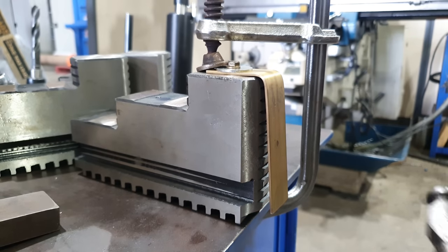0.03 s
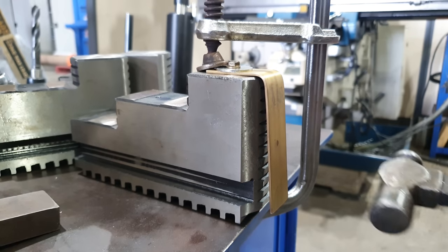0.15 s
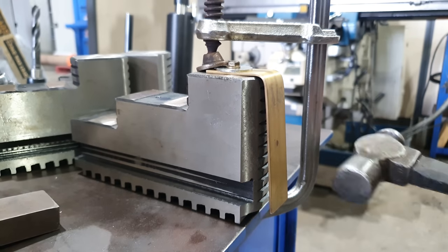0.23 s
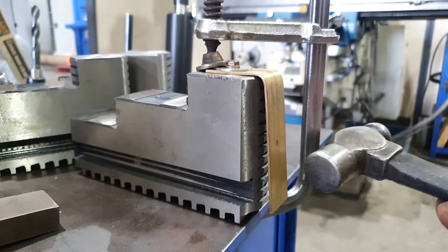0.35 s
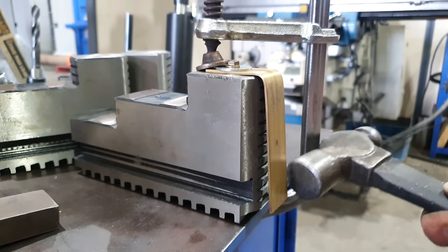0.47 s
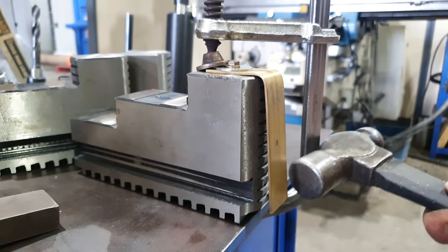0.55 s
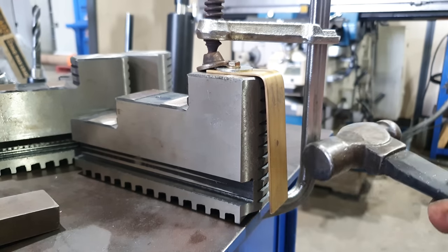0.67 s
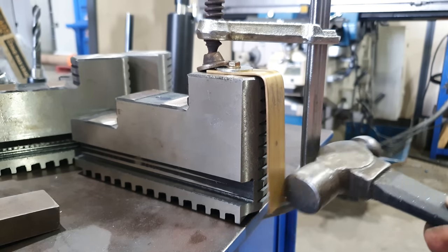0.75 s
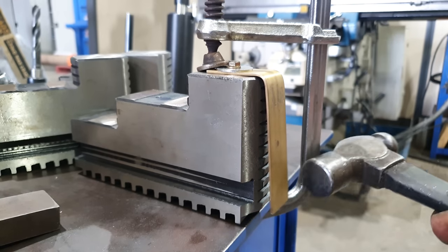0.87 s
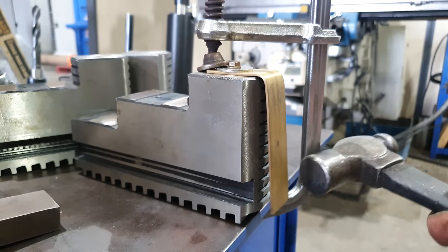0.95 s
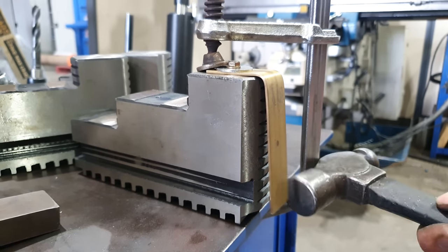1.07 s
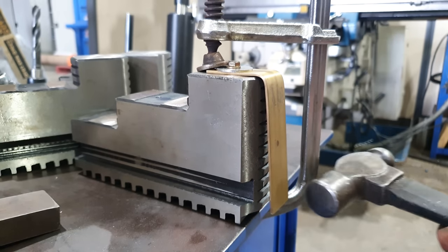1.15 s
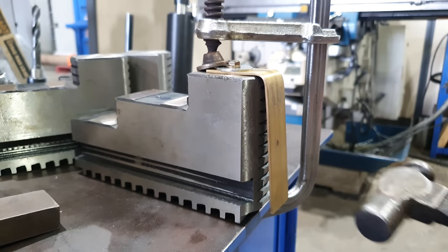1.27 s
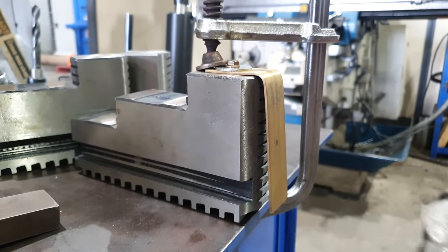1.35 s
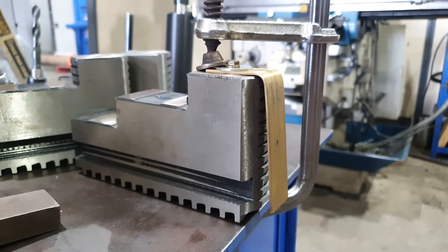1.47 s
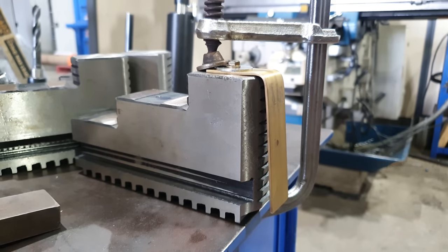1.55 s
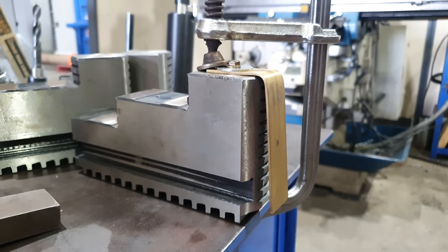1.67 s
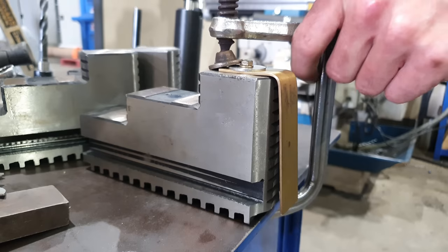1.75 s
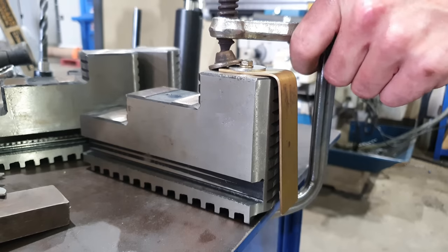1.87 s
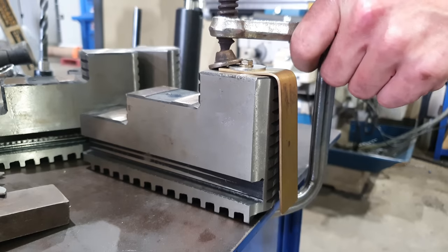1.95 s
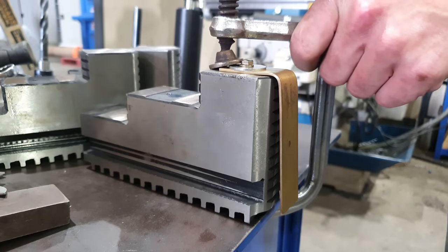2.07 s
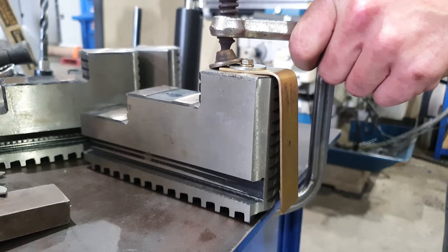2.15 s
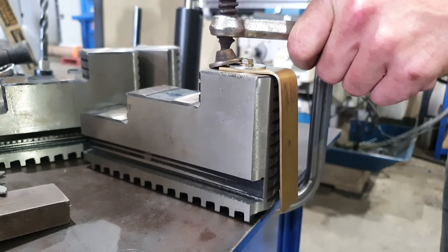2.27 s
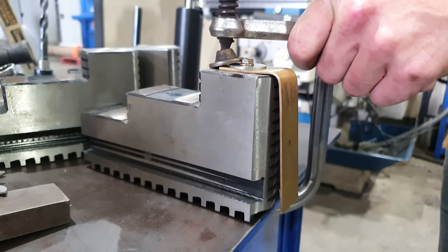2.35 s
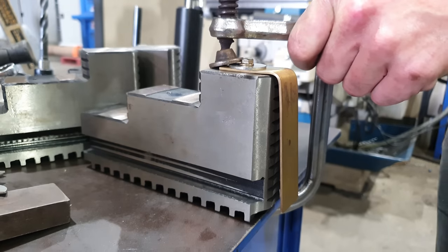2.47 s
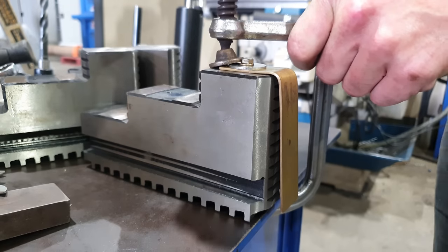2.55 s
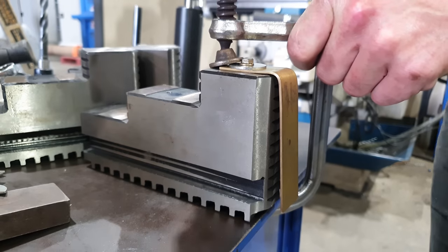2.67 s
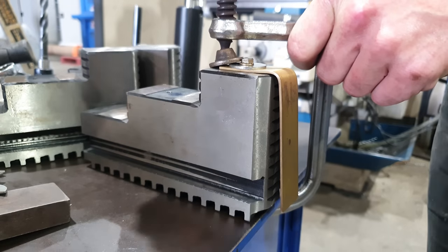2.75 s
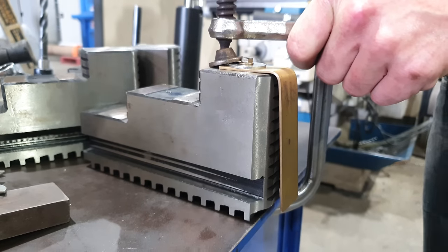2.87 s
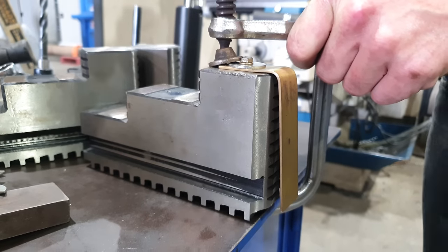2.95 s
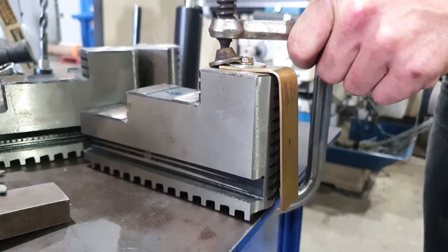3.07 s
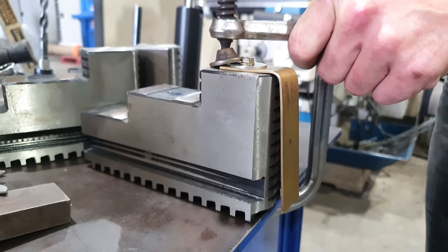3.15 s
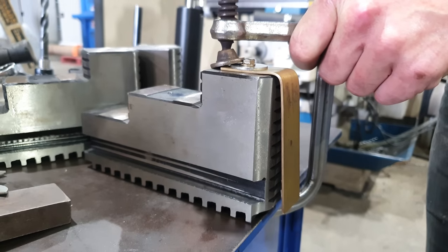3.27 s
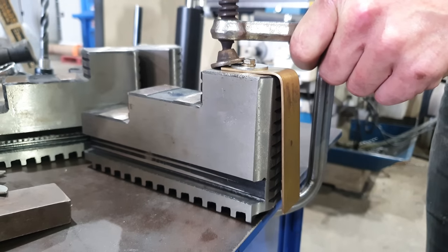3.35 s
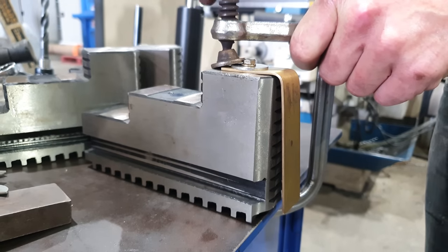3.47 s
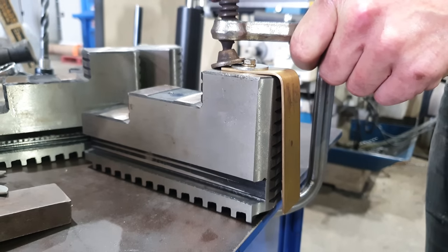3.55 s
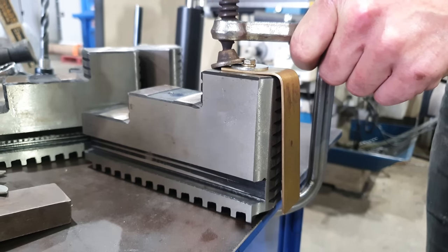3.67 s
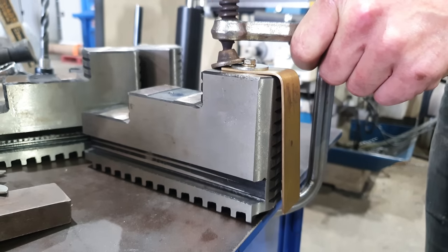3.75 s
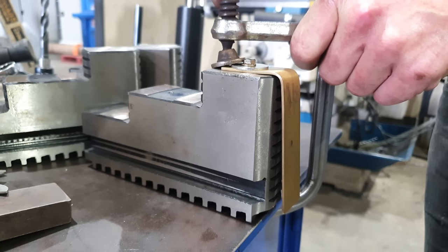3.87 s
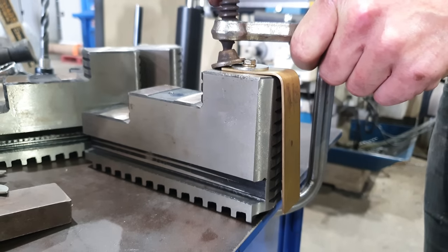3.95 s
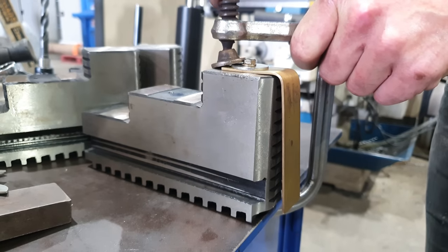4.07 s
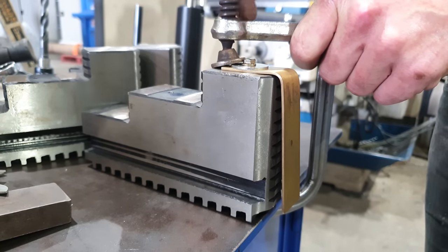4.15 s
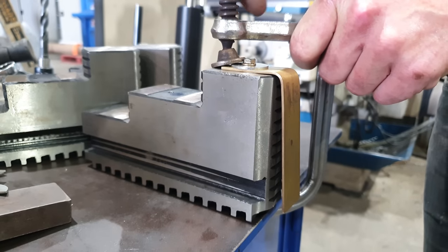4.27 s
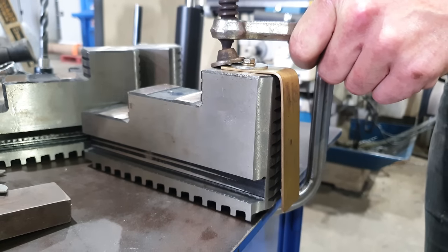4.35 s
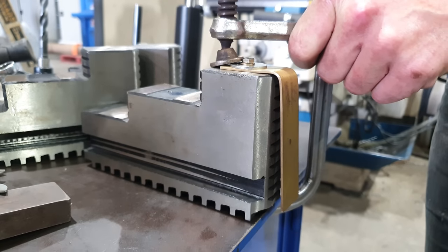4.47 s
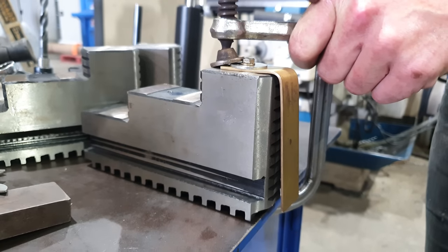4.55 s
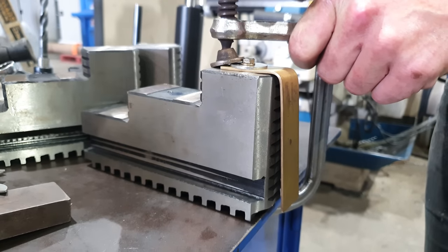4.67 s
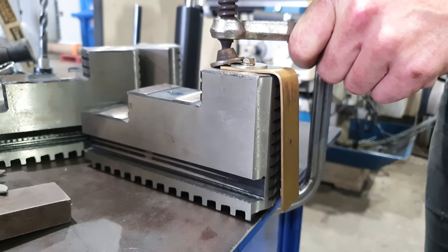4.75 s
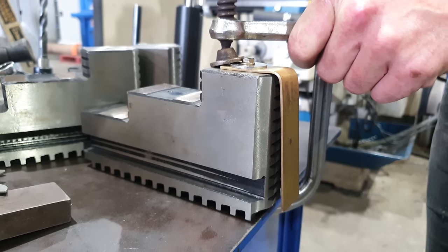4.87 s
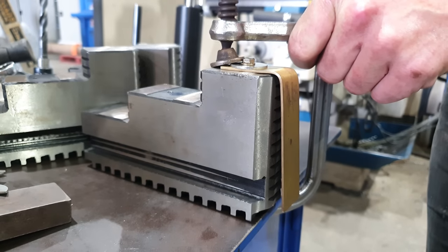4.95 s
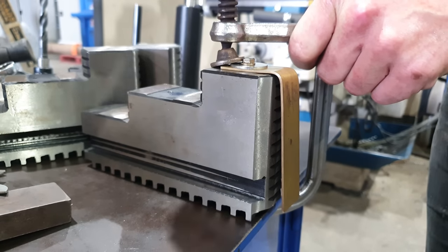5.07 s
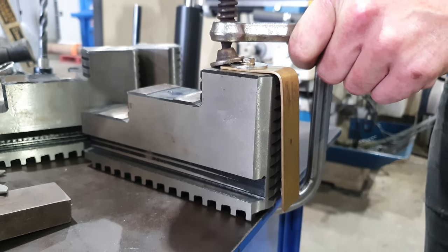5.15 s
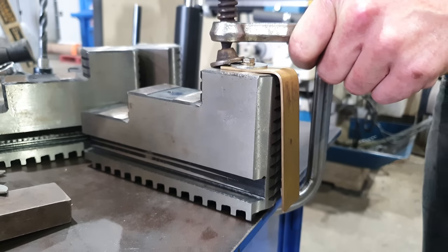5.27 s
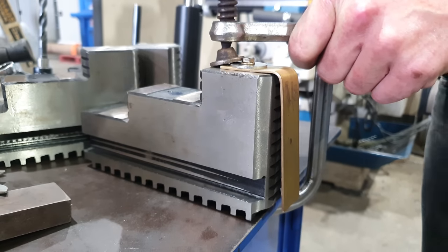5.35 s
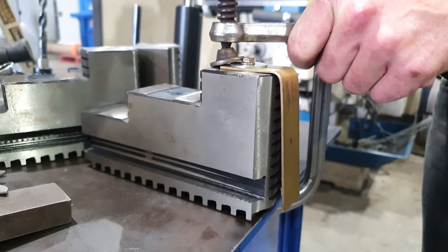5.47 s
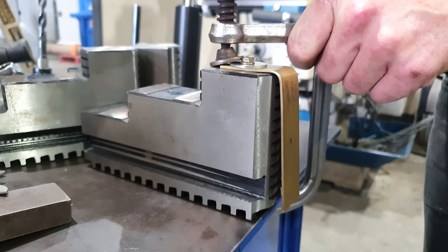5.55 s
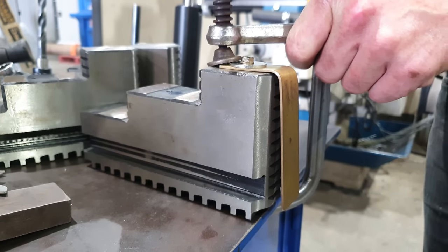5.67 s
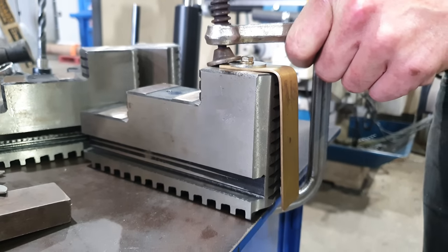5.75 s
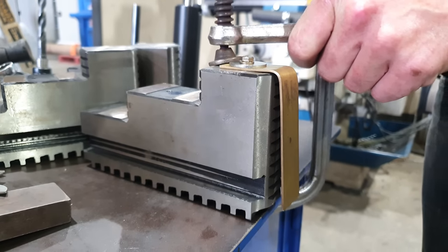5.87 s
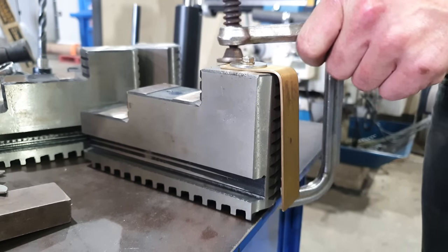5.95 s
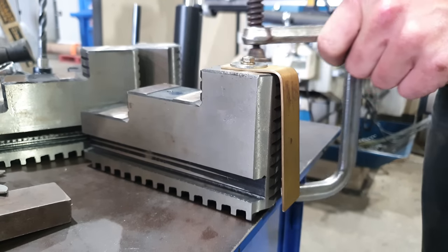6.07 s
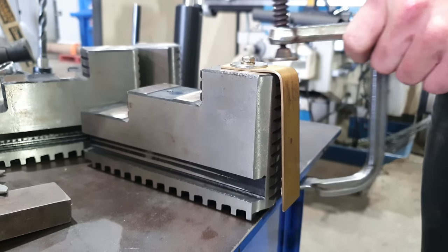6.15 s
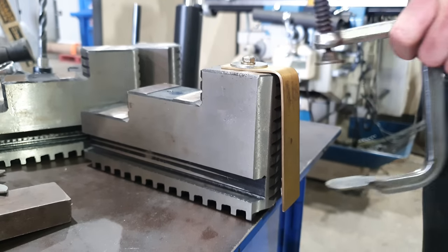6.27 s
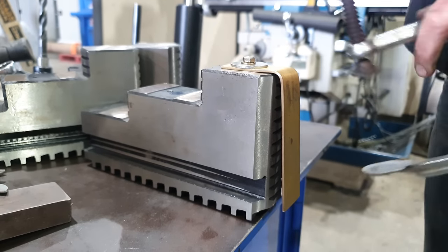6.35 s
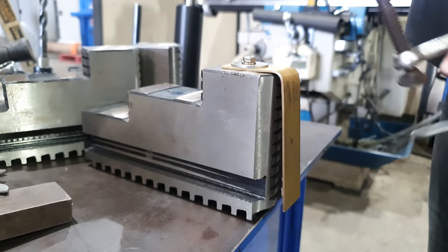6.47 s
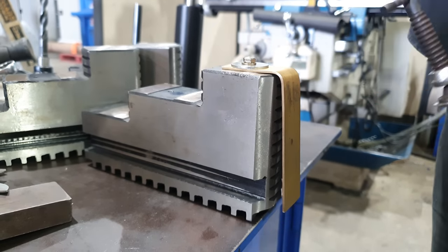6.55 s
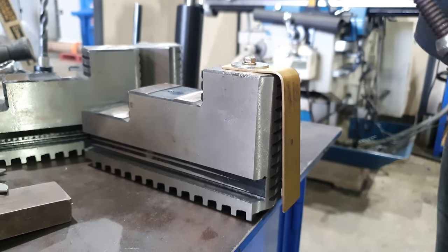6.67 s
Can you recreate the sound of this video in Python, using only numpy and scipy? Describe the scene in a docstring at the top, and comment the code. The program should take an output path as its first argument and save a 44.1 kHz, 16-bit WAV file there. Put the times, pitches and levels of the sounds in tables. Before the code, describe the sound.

In a workshop with a steady low rumble and faint machine hum, a short run of sharp, ringing hammer taps lands on metal close by. Softer, irregular knocks follow as a steel clamp is unscrewed, mixed with the quiet rub of a hand and a few slight thread squeaks. At the end the loose clamp clinks several times and rattles brightly as it is lifted off.

```python
"""In a workshop, a hammer taps a brass strip clamped on a steel jaw. A hand then works the clamp screw
loose with dull knocks, rubbing and faint squeaks; the clamp clinks, comes off and rattles away.
Each metal contact is a noisy crack plus ringing modes, echoing in the room; friction is swelling noise.
The workshop rumbles and hums behind."""
import sys
import numpy as np
from scipy import signal
from scipy.fft import rfft, irfft
from scipy.io import wavfile

SR = 44100
rng = np.random.default_rng(int(sys.argv[2]) if len(sys.argv) > 2 else 0)


def transcribe(signal):
    """Save signal, clipped to [-1, 1], as a 16-bit WAV file at the path in sys.argv[1]."""
    frames = np.atleast_2d(signal).T
    limited = np.clip(frames, -1, 1)
    pcm = np.round(limited * 32767).astype(np.int16)
    wavfile.write(sys.argv[1], SR, pcm)


N = 296352

# noise spectrum of the loose clamp: (frequency [Hz], relative density [dB])
CLAMP_SPECTRUM = [(88, -20), (150, -3), (378, -2.5), (830, -14), (2050, 6.5), (3230, -4.5), (5590, 4),
                  (9890, 0.5), (13000, 3.5), (15600, -8), (16500, -37)]


def hammer_blows():
    """Hammer, strip, jaw and clamp ring together; where a blow lands favours one pitch."""
    # (time [s], thud [dB], ring [dB], left-right [dB], favoured pitch [Hz], its lift [dB])
    blows = [(0.4793, -45, -21, -5.5, 2428, 23), (0.628, -39, -32.5, -1, 2020, 11.5),
             (0.7213, -45, -15, -1.5, 11980, 6.5), (0.9887, -49, -15.5, -0.5, 5890, 7)]
    # (frequency [Hz], relative level [dB], t60 [s])
    jaw_modes = [(329, -0.5, .15), (604, -5.5, .2), (1690, -4.5, 0.45), (2020, -3.5, .1), (2240, -8, 0.19),
                 (2387, -5.5, 0.1), (2420, -5, .1), (2479, -6.5, 0.16), (2900, -13, .1),
                 (3940, -2.5, 0.037), (4830, -10, 0.05), (5370, -7.5, .2), (5880, -16.5, 0.52),
                 (5900, -17, 0.52), (6800, 2.5, 0.11), (6470, 15, 0.039), (6600, -8, 0.25),
                 (6280, -11, 0.29), (8550, -14.5, 0.32), (8890, -4.5, 0.062), (9150, -13, 0.15),
                 (9540, -14, 0.1), (10780, -9, 0.16), (10750, -12, 0.51), (11980, 0.5, 0.13),
                 (13300, -18.5, .3), (13800, -6.5, .2), (15070, -15.5, 0.25), (15600, -11, .3)]
    # impact spectrum: (frequency [Hz], relative density [dB])
    crack = [(88, -77.5), (150, -45.5), (594, -12.5), (1140, -39), (2500, -14), (3350, -31.5), (3930, -16),
             (4870, -10.5), (6550, -1.5), (8290, -8.5), (10100, -17.5), (12300, -13), (13000, -21),
             (15600, -14), (16500, -36.5)]
    return contacts(blows, jaw_modes, crack, crack_t60_s=[0.049, 0.064, 0.022, 0.019],
                    body_db=6, body_share=0.25, sheen_db=-21.5, sheen_share=1.615, crack_db=7,
                    ring_db=-21, scatter_db=0.4, swell_rate=46, chatter_s=0.002, clean=1.0, rough=2.0)


def strip_ring():
    """A glancing blow leaves the strip's free end ringing until the next blow presses it down."""
    # free end: (frequency [Hz], level [dB], t60 [s])
    modes = [(1233, -45.5, 0.42), (3370, -46, 1)]
    start_s, stop_s = 0.64, 0.7213
    flick = np.zeros(N)
    flick[round(start_s * SR)] = 1
    out = sum(from_db(level_db) * ring(flick, hz, t60_s) for hz, level_db, t60_s in modes)
    out[round(stop_s * SR):] = 0
    return out * from_db([[-1.5], [1.5]])


def screw_knocks():
    """Screw and handle knock as the hand turns them, sounding the held clamp and the bench."""
    # (time [s], thud [dB], ring [dB], left-right [dB], favoured pitch [Hz], its lift [dB])
    knocks = [(2.2799, -30.5, -44.5, 4, 124, 19), (2.2944, -52, -81, -1, 250, 40),
              (3.01, -32.5, -39, 2, 2143, 13.5), (3.3774, -49, -49, 0, 6300, 5),
              (3.3993, -34.5, -44, 3.5, 250, 15), (3.8253, -39.5, -39, -0.5, 568, 19),
              (3.8444, -28.5, -62, 0, 327, 7.5), (4.0671, -43.5, -64, 5, 250, 8),
              (4.1222, -40.5, -75, 0, 568, 3), (4.3527, -41.5, -37.5, -2, 5170, 17),
              (4.3636, -37, -58, 6, 477, 20), (4.429, -44, -56, 0, 2143, 11),
              (4.4467, -32, -92, 3, 327, -7), (4.6738, -31, -43, 3, 568, 11), (4.812, -44, -51, 2, 2540, 8),
              (5.0412, -43, -65, 1.5, 250, 28), (5.3817, -32.5, -51.5, -1.5, 250, 19),
              (5.5493, -42, -73, -1, 124, 0)]
    # (frequency [Hz], relative level [dB], t60 [s])
    held_modes = [(124, -8.5, 0.3), (250, -9.5, 0.092), (327, 6.5, 0.066), (432, -13, .05),
                  (477, 2.5, 0.06), (568, 2, 0.092), (673, -5, .05), (937, 1, 0.04), (1289, 2, 0.21),
                  (1713, 0, 0.063), (2000, 6, 0.044), (2143, -3, 0.14), (2540, -4, 0.18), (2820, 0, 0.045),
                  (3300, -16, 0.05), (3244, 5.5, 0.056), (4120, -2, 0.046), (5170, -4, 0.029),
                  (4560, -4, 0.081), (6300, -5.5, 0.12), (9100, -29, 0.036), (13800, -9, 0.036)]
    # impact spectrum: (frequency [Hz], relative density [dB])
    crack = [(88, -34), (150, -36), (271, 7.5), (560, 1.5), (916, -21.5), (2090, -23.5), (2310, -37.5),
             (12500, -45.5), (15600, -35), (16500, -60)]
    return contacts(knocks, held_modes, crack, crack_t60_s=[0.15, 0.19, 0.074, 0.024],
                    body_db=-4, body_share=0.44, sheen_db=-1, sheen_share=3.3, crack_db=-1.5,
                    ring_db=-10.5, scatter_db=2.5, swell_rate=37, chatter_s=0.025, clean=0.95, rough=0.69)


def clamp_clinks():
    """The loose clamp clinks and rattles in its own modes."""
    # (time [s], thud [dB], ring [dB], left-right [dB], favoured pitch [Hz], its lift [dB])
    clinks = [(5.648, -57, -29, -6, 6830, 15.5), (5.6525, -45.5, -32, 8, 11460, 16),
              (5.7733, -56, -39, 2.5, 4950, 20.5), (5.9344, -46.5, -49.5, 0, 6350, 25),
              (5.975, -48, -62, 4, 1240, 11.5), (5.9968, -25.5, -25, 0, 2000, 12),
              (6.0794, -50, -51.5, -6, 1240, 15), (6.3165, -45.5, -30.5, 0.5, 4040, 26),
              (6.3649, -44.5, -20.5, -1, 7900, 25.5), (6.4034, -45, -24, 3, 4040, 17),
              (6.5051, -40, -17, -0.5, 5680, 21), (6.5095, -48, -28, 4, 4040, 25),
              (6.5254, -78, -32, -16, 5680, -1), (6.5373, -90, -21.5, 1, 7240, 4),
              (6.5473, -88, -27, -1, 11180, -12)]
    # (frequency [Hz], relative level [dB], t60 [s])
    loose_modes = [(285, 2.5, 0.15), (1240, 6, 0.075), (1512, 4.5, 0.12), (1780, -8, 0.042),
                   (2046, 3.5, 0.075), (2270, -2, .05), (2600, -2, 0.083), (2860, -9, 0.041),
                   (4040, -17, 0.06), (4950, -15.5, 0.075), (5680, -19.5, 0.13), (6350, -16, 0.16),
                   (6830, -7.5, 0.046), (7240, -7, 0.077), (7900, -12.5, 0.037), (8400, -2, .04),
                   (10770, -18, 0.28), (11180, -0.5, 0.051), (11460, -21, 0.19), (12200, -4, 0.074),
                   (12950, -22, .1), (14000, -4, 0.046), (15100, -12, .07)]
    return contacts(clinks, loose_modes, CLAMP_SPECTRUM, crack_t60_s=[0.076, 0.12, 0.024, 0.013],
                    body_db=-4.5, body_share=0.12, sheen_db=-7.5, sheen_share=1.278, crack_db=0.5,
                    ring_db=-8.5, scatter_db=1.2, swell_rate=28, chatter_s=0.004, clean=0.64, rough=1.31)


def contacts(events, modes, crack, crack_t60_s, body_db, body_share, sheen_db, sheen_share,
             crack_db, ring_db, scatter_db, swell_rate, chatter_s, clean, rough):
    """Each contact gives a noisy crack dying range by range and rings each mode at its own strength."""
    # thud, body, ring, sheen: (low [Hz], high [Hz])
    ranges_hz = [(110, 900), (900, 3500), (3500, 9500), (9500, 16000)]
    time_s, thud_db, ring_range_db, pan_db, favoured_hz, lift_db = np.transpose(events)
    hardness_db = ring_range_db - thud_db  # harder contacts lift body and sheen
    levels_db = [thud_db, thud_db + body_db + body_share * hardness_db,
                 ring_range_db, thud_db + sheen_db + sheen_share * hardness_db]
    onsets = np.round(time_s * SR).astype(int)
    sides = from_db(np.outer([0.5, -0.5], pan_db))

    noise = port_noise(crack, alike_share=0.98)
    out = np.zeros((2, N))
    for (low, high), level_db, t60_s in zip(ranges_hz, levels_db, crack_t60_s):
        clicks = np.zeros((2, N))
        clicks[:, onsets] = sides * from_db(level_db + crack_db)
        decay = from_db(-60 / (t60_s * SR))
        fading = signal.lfilter([1], [1, -decay], clicks + 1e-18)
        swell = 1 - np.exp(-swell_rate * np.sqrt(low) / SR)  # lows swell later
        envelope = signal.lfilter([swell], [1, swell - 1], fading)
        out += envelope * unit_rms(band(noise, low, high))

    strength_db = scatter_db * rng.standard_normal((len(onsets), len(modes), 2)).T + ring_db
    log_pitch = np.log(np.array(modes)[:, :1])
    strength_db += lift_db * np.exp(-((log_pitch - np.log(favoured_hz)) / 0.04) ** 2)  # 4 % wide
    delays_s = rng.random((len(onsets), 3)) * [0, 1, 1] * chatter_s  # a hit and two rebounds
    touches = onsets[:, None] + (delays_s * SR).astype(int)
    beating = flutter(rate_hz=68)  # stands for clusters of close modes
    beating[1] = 0.34 * beating[0] + 1.6 * beating[1]
    splits_hz = [high for low, high in ranges_hz[:-1]]
    for k, (hz, mode_db, t60_s) in enumerate(modes):
        level_db = levels_db[np.searchsorted(splits_hz, hz)]
        gains = sides * from_db(level_db + mode_db + strength_db[:, k])
        clicks = np.zeros((2, N))
        clicks[:, touches] = gains[:, :, None] * [1, 0.45, 0.3]
        if hz > 800 and k % 3 == 2:  # some high modes reach the channels in opposite phase
            clicks[1] *= -1
        beats = clean + rough * np.roll(beating, k * 4001, axis=1)
        out += beats * ring(clicks, hz, t60_s)
    return out


def jingle():
    """The clamp is carried off: uneven clicks ring loose parts of many pitches, over scraping hiss."""
    # (time [s], level [dB])
    envelope = [(6.31, -45.5), (6.36, -39), (6.37, -29.5), (6.43, -36.5), (6.48, -31), (6.51, -22.5),
                (6.55, -44), (6.72, -52)]
    clicks_per_s = 90
    (gain,) = gain_curves(envelope)
    parts = 0
    for hz in np.geomspace(2600, 15000, num=30):
        sizes = from_db(3 * np.minimum(rng.exponential(1, N), 4)) * rng.choice([-1, 1], (2, N))
        clicks = (rng.random(N) < clicks_per_s / SR) * sizes
        parts += from_db(at_hz(CLAMP_SPECTRUM, hz)) * np.sqrt(hz) * ring(clicks, hz, t60_s=0.052)
    hiss = unit_rms(band(port_noise(CLAMP_SPECTRUM, alike_share=0.33), 2730, 16400))
    return gain * (0.81 * unit_rms(parts) + 0.64 * hiss) * from_db([[-1.5], [1.5]])


def rubbing():
    """Skin on steel: a bright whisper and a lower scrape, held through the grip, swelling at slips."""
    # (centre [s], half length [s], whisper [dB], scrape [dB])
    slips = [(1.757, 0.053, -74, -72), (2.311, 0.024, -55, -71), (2.488, 0.094, -64, -71.5),
             (2.705, 0.014, -66.5, -92), (3.142, 0.03, -55.5, -77), (3.234, 0.033, -68, -80),
             (3.402, 0.021, -55, -42), (3.614, 0.031, -60, -70), (3.862, 0.035, -63, -66),
             (4.09, 0.039, -82, -72), (4.317, 0.063, -57.5, -53), (4.42, 0.18, -81, -52),
             (4.67, 0.022, -66, -51), (4.844, 0.024, -69, -63), (4.99, 0.052, -60.5, -66),
             (5.172, 0.016, -66, -65), (5.484, 0.022, -63.5, -74), (5.585, 0.088, -63, -72),
             (5.91, 0.025, -65, -59), (6.15, 0.019, -67, -80)]
    # both: (frequency [Hz], relative density [dB])
    whisper_spectrum = [(2350, -12), (4000, -5.5), (4350, -16), (7500, -8), (9600, -12), (12200, -3.5),
                        (15400, -7.5), (16000, -25), (16500, -42)]
    scrape_spectrum = [(760, 6), (1300, -9), (1740, -15), (2410, 5), (3140, -20), (3720, -32), (4790, -8),
                       (9000, -28), (11700, -91), (19800, -120)]
    start_s, stop_s, ease_s = 1.64, 6.3, 0.065
    t = np.arange(N) / SR
    grip = np.clip(np.minimum(t - start_s, stop_s - t) / ease_s, 0, 1)
    whisper, scrape = from_db(-82) * grip, from_db(-73) * grip
    for centre_s, half_s, whisper_db, scrape_db in slips:
        swell = np.exp(-((t - centre_s) / half_s) ** 2)
        whisper += from_db(whisper_db) * swell
        scrape += from_db(scrape_db) * swell
    stick_slip = from_db(3.4 * flutter(rate_hz=190))
    return (whisper * stick_slip * port_noise(whisper_spectrum, alike_share=0.71)
            + scrape * port_noise(scrape_spectrum, alike_share=0.65))


def thread_squeaks():
    """Friction in the screw thread sounds one narrow resonance per squeak."""
    # (centre [s], half length [s], pitch [Hz], level [dB])
    squeaks = [(2.5, 0.067, 4400, -66), (3.5, 0.037, 2143, -70), (4.33, 0.092, 2730, -59)]
    t = np.arange(N) / SR
    out = 0
    for centre_s, half_s, hz, level_db in squeaks:
        swell = np.exp(-((t - centre_s) / half_s) ** 2)
        out += from_db(level_db) * swell * unit_rms(ring(rng.standard_normal((2, N)), hz, t60_s=0.019))
    return out


def reverb(x):
    """Room echo: a stereo noise tail dying band by band, starting 4 ms late."""
    # (frequency [Hz], t60 [s], relative level [dB])
    room = [(299, .7, -36), (1017, 0.41, -24), (1707, 0.39, -30), (2510, 1.1, -28.5), (3880, 0.49, -28.5),
            (6020, 1.3, -42.5), (9700, 0.67, -34.5), (14960, 0.43, -36.5)]
    t = np.arange(SR) / SR
    edges_hz = 150 * 2 ** np.arange(0, 7.1, 0.5)
    tail = 0
    for low, high in zip(edges_hz, edges_hz[1:]):
        hz = np.sqrt(low * high)
        fade_db = at_hz(room, hz, column=2) - 60 * t / at_hz(room, hz)
        tail += from_db(fade_db) * band(rng.standard_normal((2, SR)), low, high)
    onset = np.clip((t - 0.004) / 0.004, 0, 1)
    return signal.fftconvolve(x, 0.23 * tail * onset, axes=1)[:, :N]


def workshop():
    """Rumble, broad murmur and two thin, slightly unsteady machine tones."""
    # (time [s], rumble [dB], murmur [dB])
    noise_levels = [(0.0, -50.5, -56.5), (0.32, -48.5, -54), (0.63, -38.5, -46), (0.85, -42.5, -49.5),
                    (1.38, -48, -53), (1.8, -44.5, -52.5), (2.38, -39.5, -50.5), (2.75, -42, -51),
                    (4.19, -43, -50), (4.57, -42, -47.5), (5.02, -42.5, -51), (6.45, -41, -48.5),
                    (6.72, -47.5, -57.5)]
    # both: (frequency [Hz], relative density [dB])
    rumble_spectrum = [(12, -49), (20, -18.5), (29, -3), (47, -3.5), (64, 3), (140, -8.5), (195, -8.5),
                       (226, -9.5), (259, -10), (300, -11), (390, -40.5), (660, -120)]
    murmur_spectrum = [(88, -36), (150, -14.5), (201, -4.5), (227, -12.5), (281, -9), (356, -6.5),
                       (442, -9.5), (518, -8), (738, -12.5), (847, -13.5), (1090, -16), (1330, -18),
                       (4330, -32), (8000, -37.5), (9600, -44.5), (12500, -41), (15500, -49.5),
                       (16500, -70.5)]
    # (lower [Hz], upper [Hz])
    tones_hz = [903, 1075]
    # before channel gains: (time [s], lower [dB], upper [dB])
    tone_levels = [(0, -65, -60), (1.599, -69, -63), (1.75, -55, -51.5), (2.6, -75, -53), (3.001, -54, -59),
                   (6.72, -65, -59.5)]
    rumble, murmur = gain_curves(noise_levels)
    out = rumble * port_noise(rumble_spectrum, alike_share=0.97)
    out += murmur * port_noise(murmur_spectrum, alike_share=0.91)
    for hz, gain in zip(tones_hz, gain_curves(tone_levels)):
        wander_rad = np.cumsum(0.012 * rng.standard_normal(N))
        out += gain * np.sin(2 * np.pi * hz * np.arange(N) / SR + wander_rad) * [[1.5], [-0.8]]
    return out


def port_noise(spectrum, alike_share):
    """Coloured stereo noise: right is the left shifted ahead in phase, plus a part of its own."""
    # between two microphone ports: (frequency [Hz], coherence before scaling and clipping [-])
    likeness = [(60, 2), (150, 0.6), (380, 1.83), (950, -0.26), (2380, .5), (5980, 0.32), (15000, -5.5)]
    # (frequency [Hz], left minus right phase [rad])
    phase = [(60, 0), (150, -.35), (430, -1.1), (1120, -2.1), (3010, -2.4), (6460, -1.6), (16400, -1.4)]
    # (frequency [Hz], left-right [dB])
    balance = [(60, -2.5), (150, 3), (300, 1), (600, 1.5), (1100, -3), (2400, -0.5), (6000, -3),
               (15000, 3.5)]
    hz = np.fft.rfftfreq(N, 1 / SR)
    left, own = rfft(rng.standard_normal((2, N))) * from_db(at_hz(spectrum, hz)) * (hz > 34)
    alike = np.clip(at_hz(likeness, hz) * alike_share, 0, 1)
    right = alike * left * np.exp(-1j * at_hz(phase, hz)) + np.sqrt(1 - alike ** 2) * own
    tilt = from_db(at_hz(balance, hz) / 2)
    return unit_rms(irfft([left * tilt, right / tilt], N))


def ring(clicks, hz, t60_s):
    """One mode: a unit click starts a decaying sine of height 1."""
    radius, step_rad = from_db(-60 / (t60_s * SR)), 2 * np.pi * hz / SR
    feedback = [1, -2 * radius * np.cos(step_rad), radius * radius]
    return signal.lfilter([0, np.sin(step_rad)], feedback, clicks + 1e-18)


def flutter(rate_hz):
    """Slow unit-RMS noise, independent per channel."""
    pole = np.exp(-2 * np.pi * rate_hz / SR)
    return unit_rms(signal.lfilter([1], [1, -2 * pole, pole * pole], rng.standard_normal((2, N))))


def gain_curves(rows):
    """Rows of (time [s], levels [dB]) to per-sample gains; silent outside their span."""
    time_s, *columns = np.transpose(rows)
    t = np.arange(N) / SR
    return [from_db(np.interp(t, time_s, db, left=-150, right=-150)) for db in columns]


def at_hz(points, hz, column=1):
    """Read a table on a log-frequency axis."""
    points = np.array(points)
    return np.interp(np.log(np.maximum(hz, 1)), np.log(points[:, 0]), points[:, column])


def band(x, low_hz, high_hz):
    """Third-order band-pass."""
    return signal.sosfilt(signal.butter(3, [low_hz, high_hz], "band", fs=SR, output="sos"), x)


def from_db(db):
    """Decibels to gain."""
    return 10 ** (np.asarray(db) / 20)


def unit_rms(x):
    """Scale to unit power."""
    return x / np.sqrt(np.mean(x ** 2) + 1e-20)


def scene():
    """Blows, knocks, clinks and strip echo in the room; the rest is added dry."""
    metal = hammer_blows() + screw_knocks() + clamp_clinks() + strip_ring()
    return metal + reverb(metal) + jingle() + rubbing() + thread_squeaks() + workshop()


def record(dry):
    """Soft-clip the peaks, then cut the top steeply."""
    stopband_hz = 16500
    rounded = np.tanh(dry / 1.3) * 1.3 * 0.97
    return signal.sosfilt(signal.cheby2(18, 70, stopband_hz, fs=SR, output="sos"), rounded)


dry = scene()
out = record(dry)
transcribe(out)
```